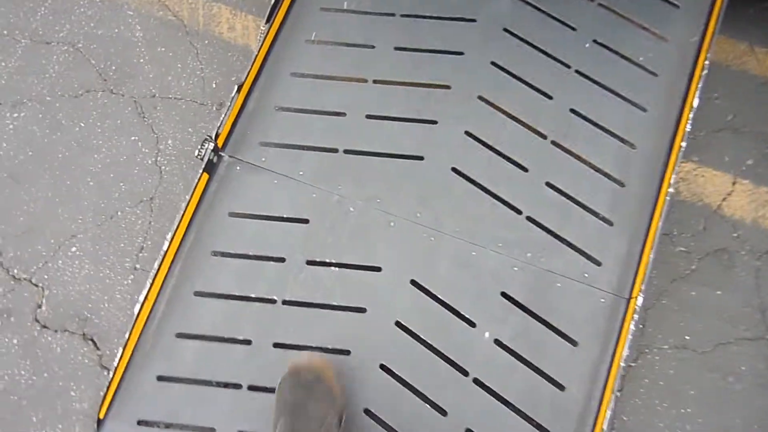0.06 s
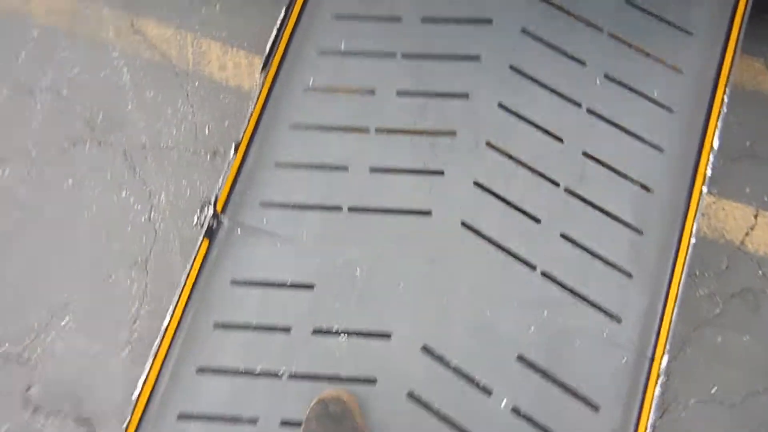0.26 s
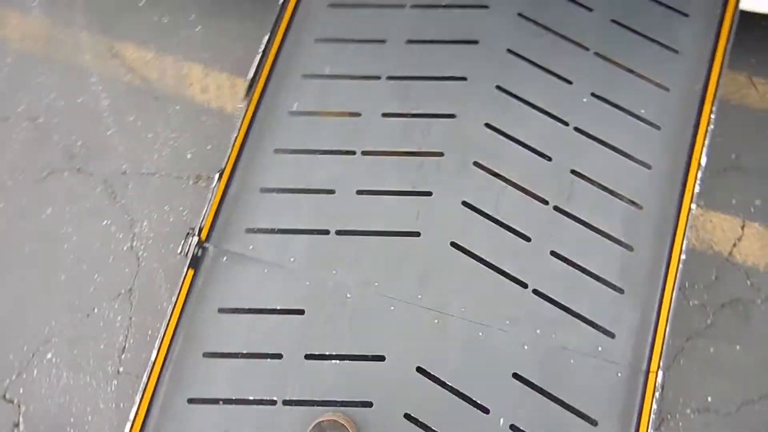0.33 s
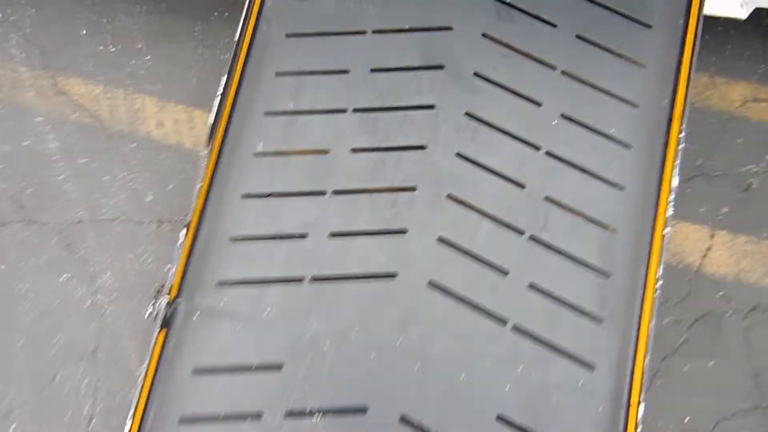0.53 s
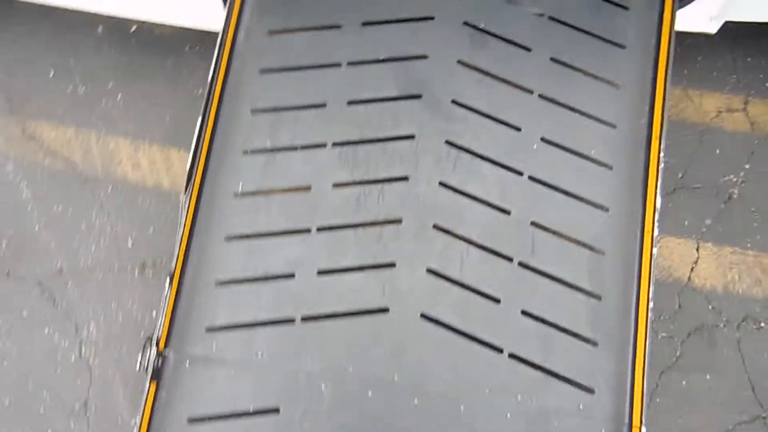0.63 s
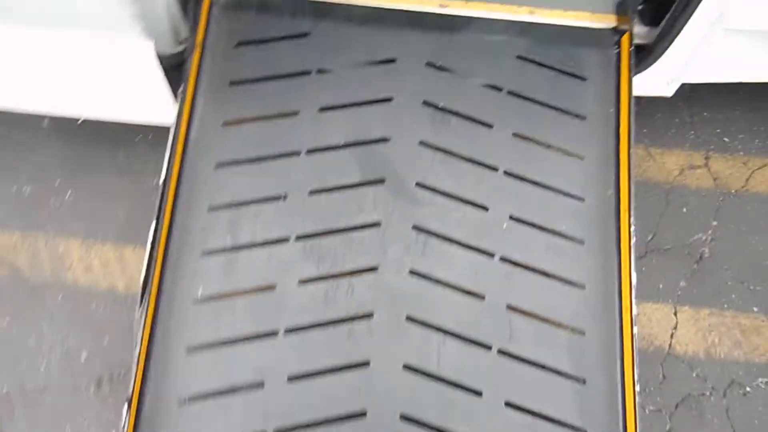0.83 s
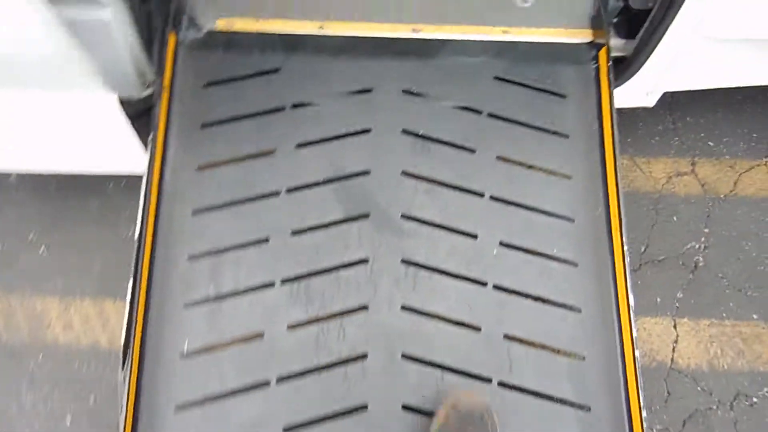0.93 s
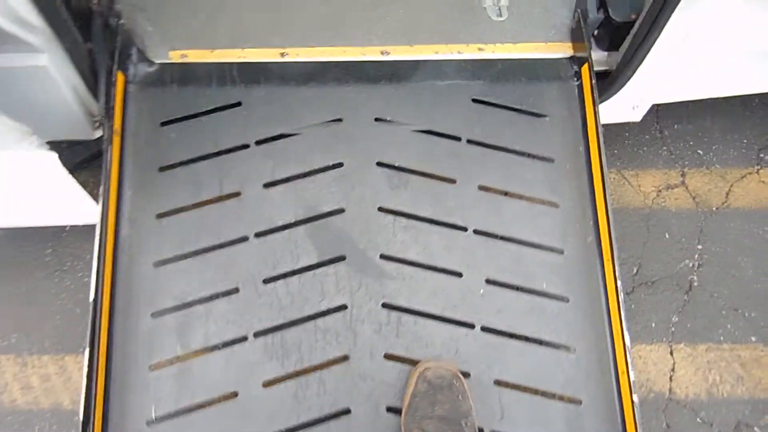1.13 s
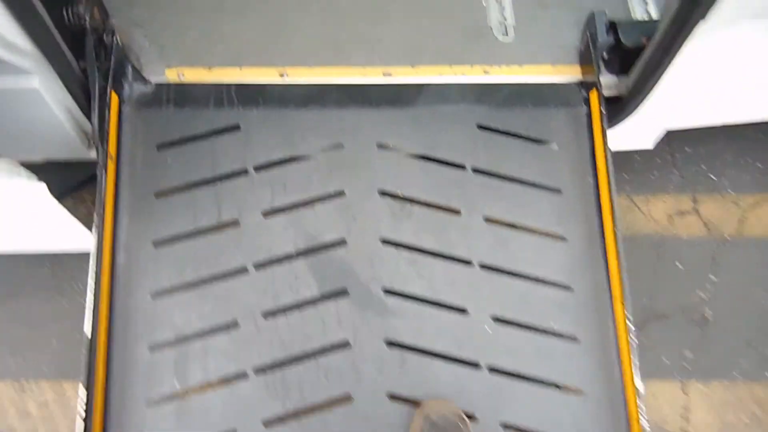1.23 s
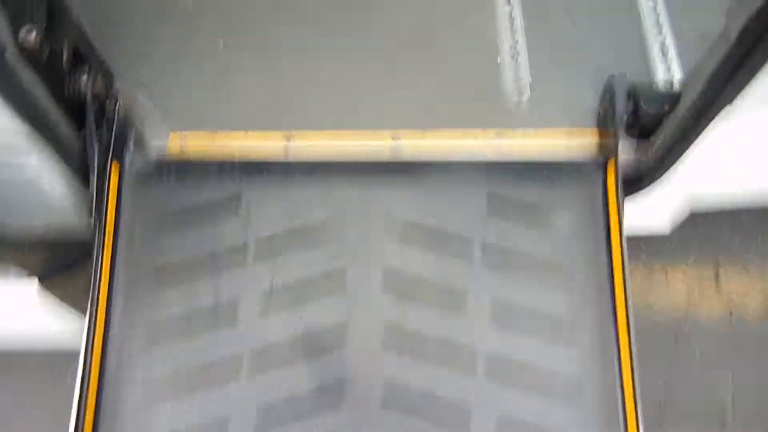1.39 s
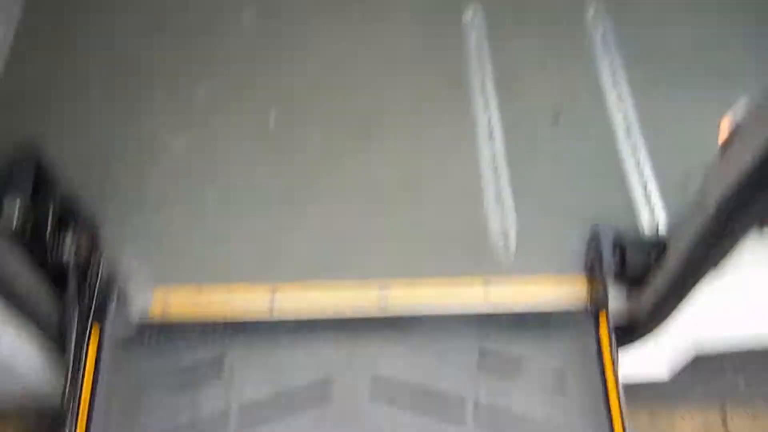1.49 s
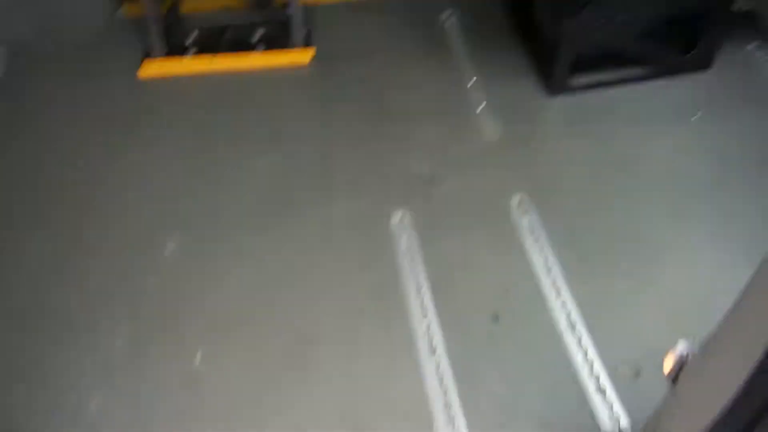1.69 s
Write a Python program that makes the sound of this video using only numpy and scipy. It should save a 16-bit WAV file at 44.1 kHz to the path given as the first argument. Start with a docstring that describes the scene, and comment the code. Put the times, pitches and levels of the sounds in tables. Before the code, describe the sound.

Close by in an open car park, a foot lands on a metal van ramp with a loud, ringing clatter. A second, much softer step thumps and scuffs, over quiet traffic rumble, a low hum and a faint bird.

```python
"""An open car park, close to a folding metal van ramp, heard on a stereo pair.
A foot lands on the ramp: the two leaves slam, chatter at the hinge and settle with a slow flex,
each blow ringing the plate's modes. A second, soft step near the top gives a thump of the heel
and a scuff of the sole. Farther off lie the rumble of traffic and air, a low hum and a faint bird."""
import sys
import numpy as np
from scipy import signal
from scipy.fft import irfft
from scipy.io import wavfile
from scipy.ndimage import uniform_filter1d

SR = 44100
rng = np.random.default_rng(int(sys.argv[2]) if len(sys.argv) > 2 else 0)


def pcm_store(signal):
    """Save signal as 16-bit PCM."""
    levels = np.round(np.clip(np.atleast_2d(signal), -1, 1) * 32767)
    wavfile.write(sys.argv[1], SR, levels.astype(np.int16).T)


N = 77175
T, HZ = np.arange(N) / SR, np.fft.rfftfreq(N, 1 / SR)
# Likeness of left and right for sounds near the microphones: freq_hz, correlation
NEAR_CORRELATION = [(50, 1), (500, .99), (1000, 0.98), (2000, 0.81), (3800, 0.37), (6500, 0.27),
                    (9500, 0.27), (13000, -.35)]


def amp(db):
    """Decibels to gain."""
    return 10 ** (np.asarray(db) / 20)


def unit(x):
    """Scales to rms 1."""
    return x / np.sqrt(np.mean(abs(x) ** 2) + 1e-20)


def decay(t, t60):
    """A fall of 60 dB every t60 seconds."""
    return np.exp(-np.log(1000) * t / t60)


def read(points, hz):
    """Reads a table on a log-frequency axis."""
    f, value = np.transpose(points)
    return np.interp(np.log(hz + 1), np.log(f + 1), value)


def bumps(table, hz):
    """Peaks and gaps of a spectrum, in dB."""
    return sum(db * np.exp(-((hz - f) / width) ** 2) for f, width, db in table)


def add(mix, start_s, sound):
    """Adds a sound to the mix at start_s."""
    at = max(round(start_s * SR), 0)
    part = mix[:, at:at + sound.shape[-1]]
    part += sound[..., :part.shape[1]]


def noise_pair(correlation, size):
    """Left and right noise spectra, as alike as the table says."""
    hz = np.fft.rfftfreq(size, 1 / SR)
    alike = np.clip(read(correlation, hz), -1, 1)
    phases = np.exp(2j * np.pi * rng.random((2, len(hz))))
    mid, side = phases * np.sqrt([(1 + alike) * size / 2, (1 - alike) * size / 2])
    return np.array([mid + side, mid - side])


def waver(width_hz):
    """A random complex gain that widens a tone into a band."""
    hz = np.fft.fftfreq(N, 1 / SR)
    return unit(np.fft.ifft(np.exp(2j * np.pi * rng.random(N) - (hz / width_hz) ** 2)))


def traffic_and_air():
    """Distant traffic and moving air: a rumble whose spectrum drifts in patches."""
    # Spectrum of the rumble: freq_hz, density_db
    spectrum = [(12, -50), (20, -7), (55, -7.5), (104, -5.5), (158, -10.5), (177, -10), (193, -11),
                (293, -11.5), (388, -15.5), (472, -13.5), (513, -20), (590, -16), (1810, -26.5),
                (9140, -33), (16000, -35.5)]
    # Likeness of left and right far off: freq_hz, correlation
    far_correlation = [(30, 0.82), (120, 0.99), (300, 0.97), (1000, 0.8), (2000, 0.11), (3800, -0.2),
                       (9500, 0.26), (13000, -0.17)]
    # Slow swell above the bass: time_s, gain_db
    swell = [(0, -1), (.7, 0.6), (.9, 0.5), (1.3, -0.1), (1.56, -2.4), (1.66, 0.7), (1.75, 0)]
    air = irfft(noise_pair(far_correlation, N) * unit(amp(read(spectrum, HZ))), N)
    hz, t, frames = signal.stft(air, SR, nperseg=512)
    patches = uniform_filter1d(rng.standard_normal(frames.shape[1:]), size=8, axis=0)
    patch_db = 0.8 * unit(uniform_filter1d(patches, size=12, axis=1))
    swell_db = np.outer(hz / (hz + 300), np.interp(t, *np.transpose(swell)))
    return amp(-44) * signal.istft(frames * amp(patch_db + swell_db), SR, nperseg=512)[1][:, :N]


def machine_hum():
    """A machine's three low, wavering tones swell and ease off."""
    # Tones of the hum: pitch_hz, level_db
    tones = [(102.3, -53.5), (296, -61), (479, -64.5)]
    # Their joint swell: time_s, gain_db
    swell = [(0, -22), (.8, -3.5), (.92, -3), (1.33, 3.5), (1.5, 3), (1.75, -5)]
    hum = sum(amp(db) * unit((waver(width_hz=9) * np.exp(2j * np.pi * hz * T)).real) for hz, db in tones)
    return hum * amp(np.interp(T, *np.transpose(swell)))


def bird():
    """A faint bird's thin gliding notes, some nearly pure and some hissy."""
    # Notes: start_s, length_s, from_hz, to_hz, level_db, width_hz
    notes = [(-.03, 0.13, 6090, 5400, -56, 800), (0.601, 0.076, 5420, 5980, -58, 500),
             (0.671, 0.084, 4460, 5340, -58, 446), (0.682, .1, 8250, 9400, -67, 200),
             (1.02, .08, 9600, 8700, -65, 200), (1.032, 0.034, 3620, 3510, -53, 90),
             (1.054, 0.032, 3400, 3310, -49.5, 130), (1.033, 0.068, 4260, 4290, -52.5, 70)]
    out = np.zeros((2, N))
    for start_s, length_s, from_hz, to_hz, db, width_hz in notes:
        progress = np.clip((T - start_s) / length_s, 0, 1)
        tone = np.exp(2j * np.pi * np.cumsum(from_hz + (to_hz - from_hz) * progress) / SR)
        flutter = waver(width_hz) + np.array([waver(width_hz), waver(width_hz)])  # shared + each side
        out += amp(db) * np.sqrt(abs(np.sin(np.pi * progress))) * (tone * flutter).real
    return out


def ramp_sides(hz):
    """The ramp's gains at the two microphones: bass leans left, the rest right."""
    # Left minus right: freq_hz, balance_db
    balance = [(100, 1.7), (700, -2.2), (1400, -.8), (2800, -3.5), (5600, -1.8), (12000, -0.7)]
    return amp(np.outer([.5, -.5], read(balance, hz)))


def plate_spectrum(hz):
    """The crowd of weak modes that every blow draws from the plate."""
    # Overall outline: freq_hz, density_db
    outline = [(40, -16), (160, -22), (250, -7), (330, -7.5), (430, -6.5), (620, -2.5), (1100, 5),
               (1850, -4.5), (2300, -5.5), (3000, -5), (4200, -11), (5400, -8.5), (7400, -10.5),
               (10000, -15), (13000, -22), (16000, -20)]
    # Clusters of modes and gaps between them: centre_hz, width_hz, gain_db
    clusters = [(332, 23, -19), (423, 46, 3), (523, 37, 4), (559, 14, -8), (823, 31, -6), (917, 18, -11),
                (1378, 38, -16), (1460, 15, -0.5), (1644, 17, 1), (2020, 15, -1), (2270, 45, -4),
                (3270, 25, 2), (3510, 52, 5), (4570, 74, 2.5), (5350, 47, -3), (5370, 150, 5),
                (6460, 47, -9), (7320, 130, 2), (8040, 65, -12), (8900, 87, 3), (10370, 50, 5.5),
                (9700, 120, -2.5), (10540, 76, 4.5)]
    return unit(amp(read(outline, hz) + bumps(clusters, hz)))


def steady(band, span_s=0.0079):
    """Evens out a noise band's power, so that its envelope alone shapes it."""
    power = uniform_filter1d(np.mean(band ** 2, 0), size=int(span_s * SR), mode="wrap")
    return band * np.sqrt(power.mean() / (power + 1e-20))


def contact(t, rebounds_per_s=240, rebound_s=0.00041, crack_s=0.0063):
    """Envelope of metal meeting metal: a crack and tiny random rebounds."""
    size = len(t)
    rebounds = (rng.random(size) < rebounds_per_s / SR) * rng.uniform(0.55, 2.43, size)
    pulse = t / rebound_s * np.exp(1 - t / rebound_s)
    chatter = 1 + amp(-4.5) * signal.fftconvolve(rebounds, pulse)[:size]
    return chatter / np.mean(chatter) + amp(-7.5) * np.exp(-t / crack_s)


def blow(level_db, bass_db, bite_db, treble_db, ring_factor, rise_s=0.0012, size=32768):
    """One slam: the plate's dense weak modes and its few strong ones ring and die away."""
    # Ring of the weak modes by band: centre_hz, t60_s
    bands = [(100, 1), (300, 0.4), (700, 0.19), (1500, 0.17), (3000, 0.18), (6000, 0.18), (10000, 0.15),
             (16000, 0.13)]
    # Strong modes of the ramp: pitch_hz, level_db, t60_s
    modes = [(425, -21, .27), (519, -19.5, 0.18), (751.8, -16, 0.28), (855, -23.5, 0.13),
             (997, -15.5, 0.24), (1062, -14.5, .16), (1145, -21, 0.5), (1216, -19.5, 0.22),
             (1245, -15.5, 0.15), (1464, -14, 0.18), (1540, -20, 0.26), (1653, -18.5, 0.14),
             (1697.4, -26.5, 0.64), (2040, -18.5, 0.15), (2077, -16, 0.22), (2452, -15, .12),
             (2606, -20.5, 0.21), (2920, -17, 0.13), (3490, -20, 0.072), (3940, -15, 0.084),
             (4630, -22, 0.19), (5550, -20, 0.15), (6402, -28, 0.11), (7424, -24, 0.13)]
    t, hz = np.arange(size) / SR, np.fft.rfftfreq(size, 1 / SR)
    colour = [(400, bass_db), (1110, 0), (2810, bite_db), (8000, treble_db)]  # freq_hz, gain_db
    crowd = noise_pair(NEAR_CORRELATION, size) * plate_spectrum(hz)
    crowd *= amp(read(colour, hz)) * ramp_sides(hz)
    strike = contact(t)
    tail = amp(-30) * decay(t, t60=0.4)
    centres = [f for f, _ in bands]
    out = np.zeros((2, size))
    for (_, t60), share in zip(bands, np.eye(len(bands))):
        band = steady(irfft(crowd * read(list(zip(centres, share)), hz), size))
        out += band * np.hypot(strike * decay(t, t60 * ring_factor), tail)
    for (f, db, t60), (phase, lean) in zip(modes, rng.uniform(-1, 1, (len(modes), 2))):
        # A phase gap between the microphones sets how alike they sound.
        gap = np.sign(lean) * np.arccos(np.clip(read(NEAR_CORRELATION, f), -1, 1))
        tone = np.sin(2 * np.pi * f * t + np.pi * phase + gap * np.array([[.5], [-.5]]))
        out += ramp_sides(f) * amp(db + read(colour, f)) * decay(t, t60) * tone
    return amp(level_db) * np.minimum(t / rise_s, 1) * out


def ramp_clatter():
    """The two leaves slam under the foot and chatter at the loose hinge."""
    # Blows of metal on metal: start_s, level_db, bass_db, bite_db, treble_db, ring_factor
    blows = [(0.1838, -41.5, 14.5, 9, -25, 0.15), (0.2186, -11.5, 3.5, 3.5, -11, 0.86),
             (0.2277, -16, 2, -7.5, -5, 1.05), (0.256, -17.5, 2, 7.5, -29, 0.46),
             (0.2858, -10, -4, -1.5, -3, 0.79), (.3025, -21.5, 10, 12, -2, 0.7),
             (.3216, -15, -1.5, 8.5, 15, 0.62), (0.3291, -14, 0, 9.5, 2, 1.04),
             (.3420, -22.5, -4, 9.5, 1, 1), (.3510, -19.5, 8.5, 3, -4, 0.8),
             (.3640, -24.5, -3, 2, -18, 0.68), (.3700, -15, -12, 7.5, -3, 0.72),
             (.3850, -29.5, 4, 16, 9.5, 0.61), (0.401, -28, -12, 3, 12, 0.31),
             (0.4059, -17, -5.5, 9.5, 6, 0.48), (.4195, -27, 0, 6, 0, 1.24), (.4590, -34, 4, -1.5, 8, 1.08),
             (0.5059, -26.5, 13, -5, -16, 1.12), (0.535, -42.5, 18.5, -24, -23, 0.66),
             (0.557, -37.5, -21, 4, -7, 0.6), (0.5722, -47.5, 14, -12, 6.5, 0.58)]
    out = np.zeros((2, N))
    for start_s, *settings in blows:
        add(out, start_s, amp(-2) * blow(*settings))
    return out


def ramp_flex():
    """The whole span flexes slowly under the weight."""
    # Bending swings: start_s, pitch_hz, level_db, rise_s, t60_s
    swings = [(0.27, 26.3, -16, 0.29, 1), (.26, 37.5, -29, 0.052, .45), (0.33, 36, -31, .08, 0.41)]
    out = np.zeros((2, N))
    for start_s, hz, db, rise_s, t60 in swings:
        envelope = np.minimum(T / rise_s, 1) ** 2 * decay(T, t60)
        add(out, start_s, amp(db) * envelope * np.sin(2 * np.pi * hz * T))
    return out


def sole_scuffs(top_hz=6550):
    """The sole brushes over the plate in short bursts of friction noise."""
    # Brushes: start_s, level_db, rise_s, t60_s, centre_hz, width_octaves
    brushes = [(.497, -34, 0.0044, .04, 1500, 1.0), (.659, -49, 0.013, 0.091, 2050, 0.51),
               (1.118, -41.5, 0.0024, 0.062, 900, 0.87), (1.151, -36.5, 0.0044, 0.18, 1720, 1.65)]
    # Peaks and gaps common to all brushes: centre_hz, width_hz, gain_db
    peaks = [(1320, 260, 4.5), (1870, 240, -1), (2340, 100, 5.5), (3180, 230, 4.5), (3820, 200, -4),
             (4270, 110, 8), (6060, 400, 6.5)]
    colour = amp(bumps(peaks, HZ)) / np.hypot(1, (HZ / top_hz) ** 6)
    out = np.zeros((2, N))
    for start_s, db, rise_s, t60, hz, octaves in brushes:
        band = (1 + (np.log2((HZ + 1) / hz) / octaves) ** 2) ** -1.2
        friction = irfft(noise_pair(NEAR_CORRELATION, N) * unit(band * colour), N)
        envelope = np.minimum(T / rise_s, 1) * decay(np.maximum(T - rise_s, 0), t60)
        add(out, start_s, amp(db) * envelope * friction)
    return out


def heel_knock(start_s=1.1093, knock_hz=680, rise_s=0.00076, tick_hz=2140, tick_s=0.0008):
    """The rubber heel of the soft step: a dead knock of a few cycles with a small tick."""
    knock = amp(-28) * T / rise_s * np.exp(1 - T / rise_s) * np.sin(2 * np.pi * knock_hz * T)
    tick = amp(-38) * np.exp(-T / tick_s) * np.sin(2 * np.pi * tick_hz * T)
    out = np.zeros((2, N))
    add(out, start_s, knock + tick)
    return out


def scene():
    """The car park far off, ramp and shoe close by."""
    distant = traffic_and_air() + machine_hum() + bird()
    return distant + ramp_clatter() + ramp_flex() + sole_scuffs() + heel_knock()


def record(dry, ceiling=0.86, edge_hz=15900):
    """The highest peaks are rounded off, then the top treble is cut."""
    rounded = dry / (1 + (dry / ceiling) ** 6) ** (1 / 6)
    lowpass = signal.firwin(401, edge_hz, window=("kaiser", 9), fs=SR)
    return signal.oaconvolve(rounded, lowpass[None], "same")


dry = scene()
out = record(dry)
pcm_store(out)
```